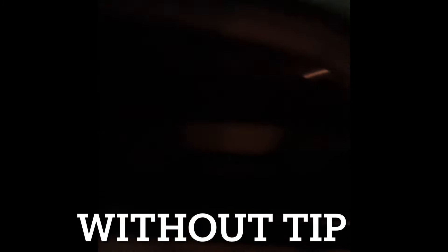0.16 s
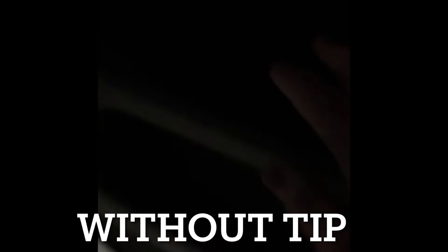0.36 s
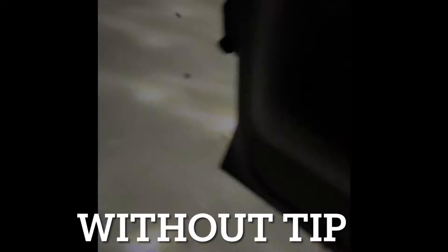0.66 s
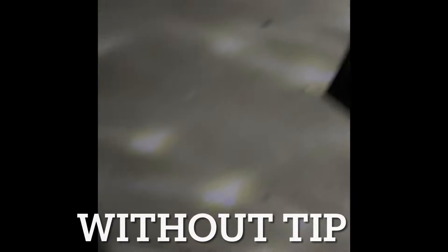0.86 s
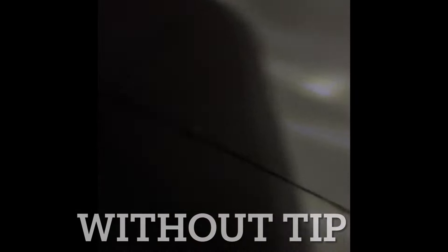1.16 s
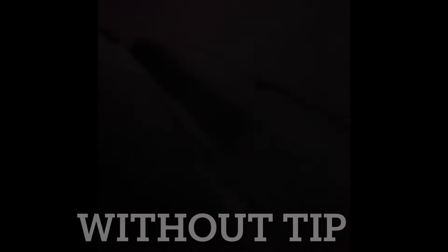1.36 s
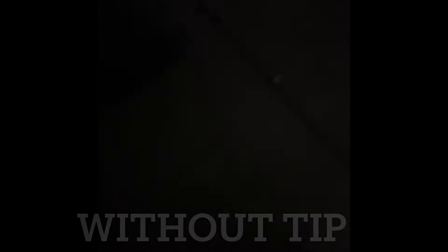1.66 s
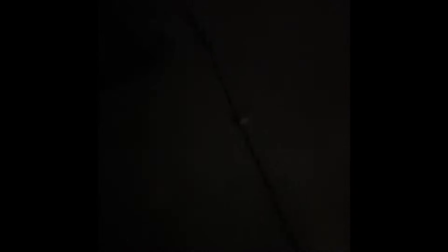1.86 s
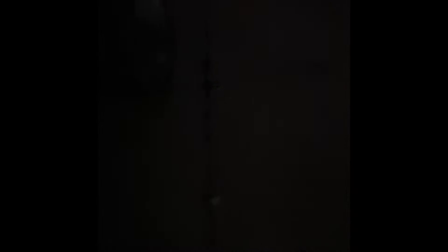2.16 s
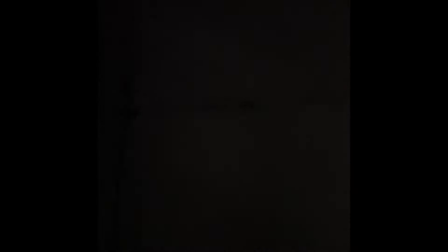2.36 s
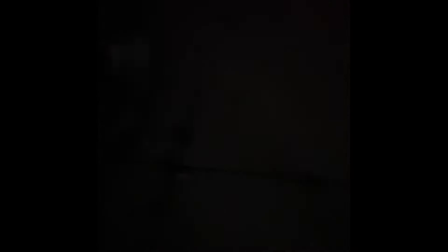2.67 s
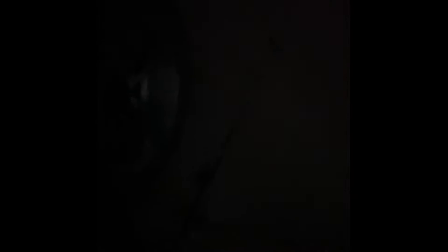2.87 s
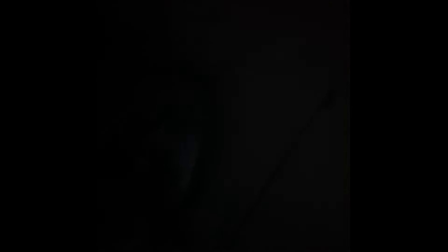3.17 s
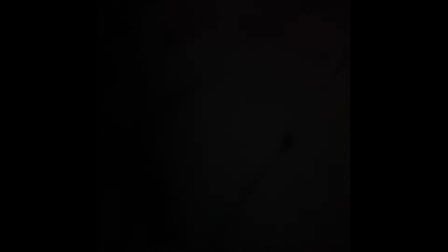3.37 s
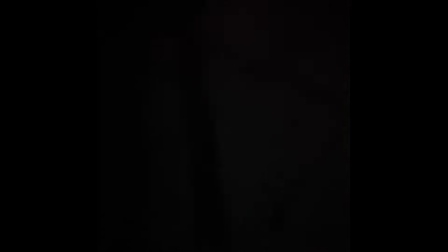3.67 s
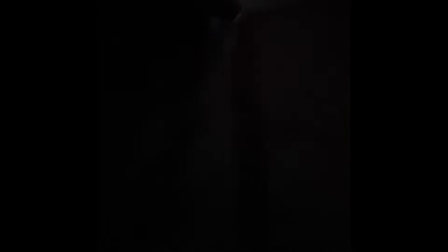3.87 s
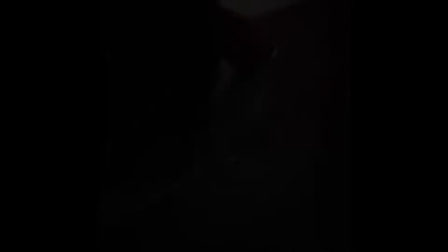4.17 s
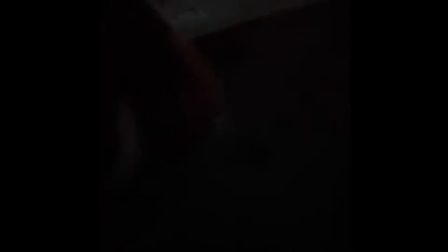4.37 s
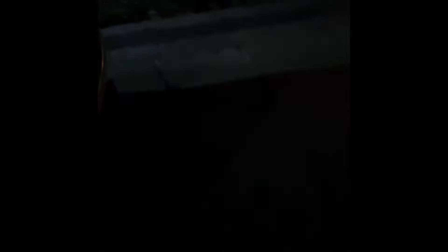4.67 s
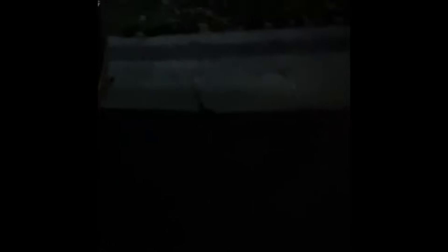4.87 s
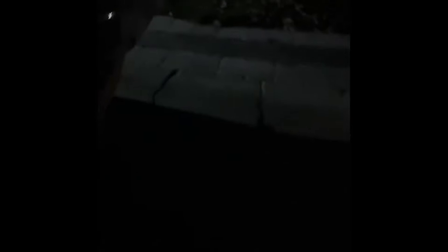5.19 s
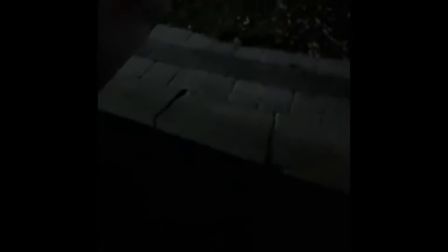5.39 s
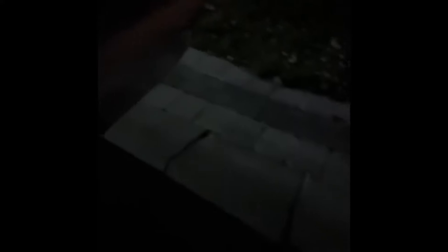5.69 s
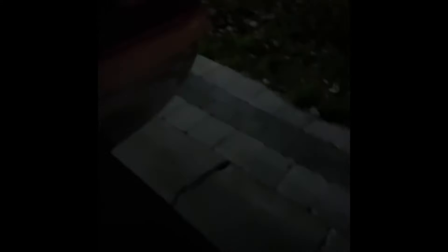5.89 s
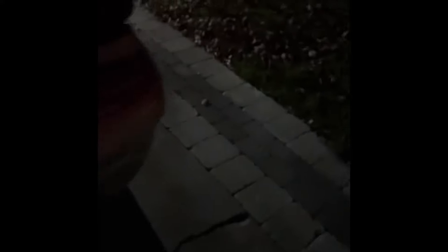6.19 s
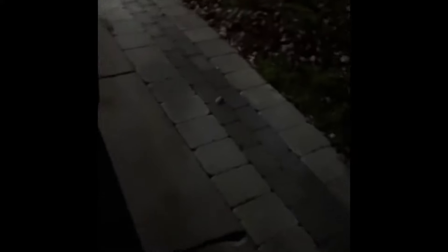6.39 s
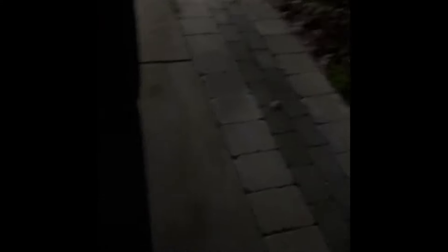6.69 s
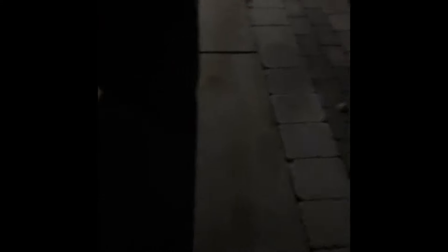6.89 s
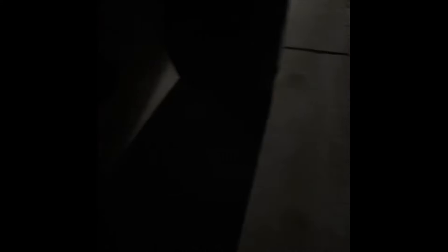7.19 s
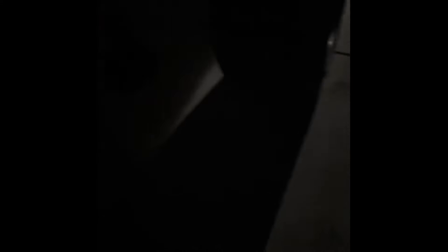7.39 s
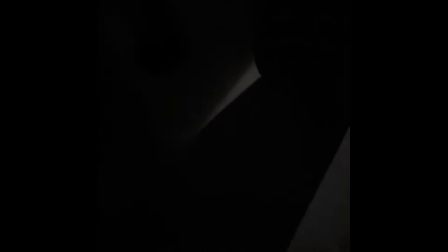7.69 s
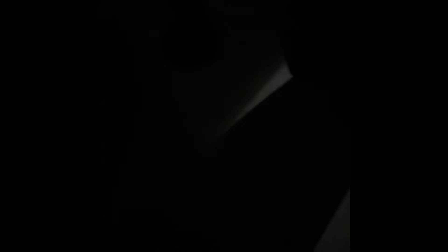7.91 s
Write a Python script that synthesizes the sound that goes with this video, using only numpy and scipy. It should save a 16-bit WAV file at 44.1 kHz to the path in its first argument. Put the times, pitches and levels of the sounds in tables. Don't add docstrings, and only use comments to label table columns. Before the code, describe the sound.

From 0 s a large turbo diesel is already running at a fast idle, heard in the cab: a deep boom near 110 Hz with a throb around 55 Hz and an uneven, loping growl. Dry taps of a hand on the phone case fall at about 0.2 and 0.6 s. Between 0.6 and 1.2 s the engine slows slightly and the bass thins as the phone moves into the garage. Clatter and turbo hiss rise from 1.4 s; the boom swells near 2 s and dips sharply around 2.6 to 2.9 s. From 3 s, outdoors, steady clattering rush leans left over a weaker throb. From 4.6 s the tailpipe jet approaches, growing into a loud, rough, puffing rush by 6 to 7 s, with a hollow sweeping ground echo. After 7.3 s it eases and the low boom fades, the engine still running at 8 s.

```python
import sys
import numpy as np
from scipy import signal
from scipy.fft import rfft, irfft
from scipy.io import wavfile
from scipy.ndimage import uniform_filter1d

SR = 44100
rng = np.random.default_rng(int(sys.argv[2]) if len(sys.argv) > 2 else 0)


def store_pcm(level_fs):
    pcm = np.round(np.clip(level_fs, -1, 1) * 32767).astype(np.int16)
    wavfile.write(sys.argv[1], SR, np.atleast_2d(pcm).T)


def how_loud(loudness_db):
    steps = np.asarray(loudness_db, float) / 20
    return 10 ** steps


N = 355005


def unit_rms(x):
    return x / np.sqrt(np.mean(abs(x) ** 2) + 1e-20)


def read_spectrum(points, hz):
    table_hz, value = np.transpose(points)
    return np.interp(np.log(hz + 1), np.log(table_hz + 1), value)


def follow(rows, t):
    time_s, *columns = np.transpose(rows)
    return [np.interp(t, time_s, column) for column in columns]


def drift(t, top_hz, count):
    hz = np.geomspace(top_hz / 10, top_hz, 12)[:, None]
    start = rng.random((count, 12, 1))
    sines = np.sin(2 * np.pi * (hz * t + start))
    return unit_rms((sines / np.sqrt(hz)).sum(1))


# (time [s], engine cycles [Hz], firing order [dB], pipe boom [dB],
# uneven low orders [dB], uneven high orders [dB])
ENGINE_CURVE = [(0.0, 7.065, -17.0, -14.0, -15.0, -24.0), (0.15, 7.054, -17.0, -11.0, -18.0, -22.0),
                (0.3, 7.039, -18.0, -9.0, -19.0, -20.0), (0.45, 6.986, -19.0, -8.0, -21.0, -20.0),
                (0.6, 6.925, -20.0, -8.0, -21.0, -21.0), (0.75, 6.704, -23.0, -15.0, -17.0, -23.0),
                (0.9, 6.703, -24.0, -12.0, -20.0, -25.0), (1.05, 6.704, -30.0, -13.0, -19.0, -28.0),
                (1.2, 6.639, -35.0, -17.0, -22.0, -30.0), (1.35, 6.626, -35.0, -18.0, -25.0, -30.0),
                (1.5, 6.677, -35.0, -15.0, -25.0, -29.0), (1.65, 6.613, -34.0, -17.0, -24.0, -28.0),
                (1.8, 6.776, -34.0, -13.0, -25.0, -29.0), (1.95, 6.768, -33.0, -11.0, -26.0, -29.0),
                (2.1, 6.795, -32.0, -11.0, -25.0, -29.0), (2.25, 6.742, -33.0, -12.0, -26.0, -29.0),
                (2.4, 6.73, -35.0, -15.0, -24.0, -28.0), (2.55, 6.543, -36.0, -25.0, -22.0, -30.0),
                (2.7, 6.479, -31.0, -25.0, -25.0, -28.0), (2.85, 6.453, -30.0, -26.0, -21.0, -26.0),
                (3.0, 6.499, -30.0, -21.0, -23.0, -30.0), (3.25, 6.564, -33.0, -18.0, -22.0, -29.0),
                (3.5, 6.639, -39.0, -16.0, -24.0, -28.0), (3.75, 6.63, -49.0, -19.0, -22.0, -26.0),
                (4.0, 6.607, -41.0, -21.0, -20.0, -26.0), (4.25, 6.604, -38.0, -19.0, -23.0, -27.0),
                (4.5, 6.644, -35.0, -14.0, -23.0, -28.0), (4.75, 6.568, -33.0, -17.0, -23.0, -25.0),
                (5.0, 6.541, -33.0, -18.0, -20.0, -26.0), (5.25, 6.552, -31.0, -18.0, -22.0, -29.0),
                (5.5, 6.564, -31.0, -19.0, -22.0, -27.0), (5.75, 6.525, -30.0, -20.0, -20.0, -25.0),
                (6.0, 6.57, -30.0, -18.0, -19.0, -23.0), (6.25, 6.649, -29.0, -16.0, -19.0, -25.0),
                (6.5, 6.629, -29.0, -17.0, -21.0, -24.0), (6.75, 6.588, -30.0, -20.0, -20.0, -25.0),
                (7.0, 6.619, -33.0, -20.0, -25.0, -28.0), (7.25, 6.59, -34.0, -22.0, -26.0, -31.0),
                (7.5, 6.6, -37.0, -25.0, -30.0, -33.0), (7.75, 6.597, -37.0, -26.0, -30.0, -34.0),
                (8.0, 6.475, -38.0, -30.0, -26.0, -34.0), (8.05, 6.473, -39.0, -30.0, -26.0, -33.0)]


def engine_cycles():
    return np.cumsum(follow(ENGINE_CURVE, np.arange(N) / SR)[0]) / SR


# (order of the engine cycle, cab [dB], garage [dB], outdoors [dB])
UNEVEN_ORDERS = [(5, -22, -37, -41.0), (6, -24, -31.0, -37), (7, -20.0, -26.0, -27), (9, -12, -16, -18),
                 (10, -20.5, -19, -27), (11, -8.5, -13.0, -13.5), (12, -7, -11.5, -12.5),
                 (13, -11, -16.0, -13), (14, -21, -13, -14.5), (15, -15, -18, -26.5), (17, -7, -7.5, -5),
                 (18, -19, -12.0, -10), (19, -10.5, -14, -17), (20, -19, -9, -10.5), (21, -15, -9.5, -9.0),
                 (22, -23, -15.5, -14.0), (23, -9, -20.5, -27), (24, -3, -9.5, -11), (25, -8.5, -15, -23),
                 (26, -7.5, -13, -9.5), (27, -9.5, -14.0, -22), (28, -13.5, -10.5, -14.5),
                 (29, -17.0, -12, -20.5), (30, -27, -5.5, -13), (31, -26, -11, -3.5),
                 (32, -7.5, -12.5, -16.5), (33, -27, -19, -25), (34, -27.0, -15.5, -19.5),
                 (35, -24, -11.5, -12), (36, -32, -14, -15.5), (37, -28, -18.0, -22), (38, -31, -18, -18),
                 (39, -31.0, -23, -31), (40, -26, -25, -21), (41, -37, -33, -22), (42, -31.0, -23.0, -29.5),
                 (43, -28, -25, -25.5)]
# (time [s], place [0 cab, 1 garage, 2 outdoors])
PHONE_PLACE = [
    (0, 0),
    (.75, 0),
    (1.1, 1),
    (2.5, 1),
    (3.1, 2),
    (8.05, 2.1),
]
# (time [s], boom change [dB], half length [s])
WEAK_FIRINGS = [(0.787, -6, 0.027), (1.08, -5, .025), (1.235, -4, .025), (1.674, -5, 0.027),
                (2.575, -10, .03), (2.85, -11, 0.018)]


def exhaust():
    step = 32
    t = np.arange(0, N + step, step) / SR
    cycle = np.interp(t, np.arange(N) / SR, engine_cycles())
    _, firing_db, boom_db, low_db, high_db = follow(ENGINE_CURVE, t)
    boom_db = boom_db + sum(db * np.exp(-((t - s) / half_s) ** 2) for s, db, half_s in WEAK_FIRINGS)
    out = how_loud(firing_db - 0.1) * np.cos(2 * np.pi * (8 * cycle + 0.32))
    out += how_loud(boom_db + 0.83) * np.cos(2 * np.pi * (16 * cycle + 0.11))
    place = follow(PHONE_PLACE, t)[0]
    wavers = drift(t, top_hz=2.5, count=len(UNEVEN_ORDERS))
    lags = rng.random(len(UNEVEN_ORDERS))
    for (order, *share_db), waver, lag in zip(UNEVEN_ORDERS, wavers, lags):
        k = round(order)
        if k in (17, 18):
            lag = .1 + k % 2 / 4
        group_db = low_db if k < 24 else high_db
        level_db = group_db + np.interp(place, range(3), share_db) + 1.5 * waver
        out += how_loud(level_db) * np.cos(2 * np.pi * (k * cycle + lag + 0.033 * waver))
    return np.sqrt(2) * signal.resample_poly(out, step, 1)[:N]


# (frequency [Hz], likeness [clipped to 0-1])
PORT_LIKENESS = [
    [(60, 2.5), (140, 0.7), (340, 1.06), (810, 0.5), (1920, 0.88), (4570, 0.18), (10900, 2)],
    [(60, 1.0), (140, 3.5), (340, 0.7), (810, 1.26), (1920, 0.9), (4570, 1.02), (10900, 2.5)],
]
# (frequency [Hz], phase [rad])
PORT_PHASE = [
    [(0, 0), (520, 0.64), (2150, -0.15), (3270, -2.4), (4220, 0.2), (5430, -6.0), (7490, -7), (8610, -6.5), (9820, -6.9), (11000, -10)],
    [(0, -8.5), (780, 0.45), (2330, -1.58), (3450, 1.5), (3960, 1), (4480, -2.4), (5000, 3), (5430, 0.55), (9470, -1.5), (11000, -2.5)],
]
# (frequency [Hz], left-right [dB])
PORT_LEAN = [
    [(60, 2), (140, -1.0), (340, -2), (810, 2.5), (1920, 0.5), (4570, 1), (10900, -1)],
    [(60, 5), (140, 2), (340, -3.5), (810, 3), (1920, 0), (4570, 3), (10900, -2.5)],
]


def ports(points, which, frames, patchy_db):
    hz = np.fft.rfftfreq(1024, 1 / SR)
    a, b, c, d, patches = rng.standard_normal((frames, 513, 5)).T
    patches = uniform_filter1d(patches, size=10, axis=0)
    patches = unit_rms(uniform_filter1d(patches, size=16, axis=1))
    same = np.clip(read_spectrum(PORT_LIKENESS[which], hz), 0, 1)[:, None]
    phase_rad = read_spectrum(PORT_PHASE[which], hz)[:, None]
    lean = how_loud(read_spectrum(PORT_LEAN[which], hz) / 2)[:, None]
    left = a + 1j * b
    right = (same * left + np.sqrt(1 - same ** 2) * (c + 1j * d)) * np.exp(-1j * phase_rad)
    colour = how_loud(read_spectrum(points, hz)[:, None] + patchy_db * patches)
    return np.array([left * lean, right / lean]) * colour


# (time [s], clatter [dB], hiss [dB], body drone [dB], left-right [dB])
RUSH_CURVE = [(0.0, -38, -39.5, -34, 0.0), (0.04, -35, -39, -34, 1.5), (0.13, -34, -37.5, -29, 1),
              (0.49, -35.5, -37.5, -32.5, 1.5), (1.41, -30.5, -36.5, -34.5, 0), (1.7, -28, -31.5, -33, 1),
              (2.11, -27.5, -30, -33, 2), (2.22, -28.5, -31.5, -30.5, 2.5), (2.33, -26.5, -30.5, -34, 2.5),
              (2.6, -30, -34, -36, 5.0), (2.76, -30, -34, -35, 4), (2.96, -27, -32.5, -31, 4.0),
              (3.09, -28.5, -33.5, -35.5, 4), (3.16, -26, -30.5, -30.5, 4), (3.34, -26, -35, -35.5, 6),
              (3.41, -26, -31, -29, 4.5), (3.52, -26.5, -32, -30.5, 5.5), (3.94, -25.5, -30, -36.5, 4),
              (3.99, -28, -32.5, -36, 3.5), (4.19, -25, -32, -33, 1), (4.24, -29, -32, -33, 1.5),
              (4.64, -27.5, -34, -32.5, 2.5), (4.71, -25, -31.5, -34.5, 3.0),
              (4.8, -24.5, -29.5, -29.5, 1.5), (4.97, -22.5, -30.5, -32, 1.5), (5.09, -23, -28, -31, 2),
              (5.18, -22.5, -29, -31, 1.5), (5.36, -22.5, -26.5, -29, 1.5), (5.67, -19.5, -24.5, -32, 2.5),
              (5.81, -18, -23, -30.5, 3), (6.05, -16.5, -21.5, -26, 2), (6.1, -15.5, -23.5, -27, 2),
              (6.14, -18.5, -21.5, -26.5, 1.0), (6.19, -18, -21.5, -27, 2), (6.28, -17.5, -24, -28, 1.5),
              (6.39, -16, -22, -29.5, 2.5), (6.43, -16.5, -21, -27.5, 2), (6.93, -18, -17.5, -31, 3.5),
              (7.29, -18, -19.5, -35, 3.5), (7.42, -21.5, -20.5, -34.5, 2.5), (7.62, -22, -24, -39, 2.5),
              (7.67, -21, -22.5, -37, 3), (8.0, -22.5, -24.5, -37.5, 1.5), (8.05, -20.5, -23, -36, 2)]
# (time [s], jet share [0-1], extra path of ground echo [ms], echo strength [0-1])
WALK_CURVE = [(0, 0.02, 1.23, 0.23), (1, 0, 1.13, 0.2), (1.5, 0.06, 1.8, 0.07), (2.4, .1, 2.55, 0.2),
              (3, 0.04, 2.57, 0.22), (3.3, 0.01, 1.79, 0.18), (4, 0.07, 1.29, 0.18), (4.6, 0.4, 1.19, 0.2),
              (5.2, 0.66, 1.93, 0.4), (5.6, .9, 2.494, 0.8), (6, 0.99, 2.894, .7), (6.6, 0.99, 3.19, .55),
              (7.4, 1, 3.03, 0.38), (8.05, 0.99, 2.37, 0.16)]
# (frequency [Hz], density [dB per Hz])
GARAGE_SPECTRUM = [(150, -31), (260, -4), (374, 0.5), (481, -8), (564, -4), (630, -6.5), (1390, -2.5),
                   (1960, -5.5), (2090, -7.5), (3200, -9.5), (3630, -10.5), (4980, -21.5), (7880, -16.5),
                   (9670, -29.5), (11300, -46.5), (14700, -74), (22000, -120)]
# (frequency [Hz], density [dB per Hz])
JET_SPECTRUM = [(150, -38), (260, -9), (295, -13), (459, -13), (513, -19), (681, -10), (785, -8.5),
                (934, -3), (1340, -1), (3100, -10), (3580, -4), (5060, -18.5), (7400, -10), (9230, -20),
                (11300, -33), (14700, -71), (22000, -120)]


def rush():
    frames, hz = N // 256 + 5, np.fft.rfftfreq(1024, 1 / SR)[:, None]
    frame_t, t = np.arange(frames) * 256 / SR, np.arange(N) / SR
    near, echo_ms, echo = follow(WALK_CURVE, frame_t)
    near = np.clip(near, 0, 1)
    z = np.sqrt(1 - near) * unit_rms(ports(GARAGE_SPECTRUM, which=0, frames=frames, patchy_db=2.0))
    z += np.sqrt(near) * unit_rms(ports(JET_SPECTRUM, which=1, frames=frames, patchy_db=1.0))
    rough_ground = np.exp(-hz / 4000.0)
    z *= 1 + echo * rough_ground * np.exp(-2j * np.pi * hz * echo_ms / 1000)

    clatter_db, hiss_db, drone_db, pan_db = follow(RUSH_CURVE, frame_t)
    cycle = engine_cycles()
    firing = np.cos(2 * np.pi * (8 * cycle + 0.42))
    double = np.cos(2 * np.pi * (16 * cycle + 0.67))
    lope = np.cos(2 * np.pi * (cycle + 0.31))
    gust = np.interp(t, frame_t, drift(frame_t, top_hz=29.98, count=1)[0])
    puff_db = 1.68 * firing + 0.94 * double + 0.74 * lope + 0.83 * gust

    out = np.zeros((2, N))
    bands = ((0, 700, drone_db, .3), (700, 2400, clatter_db, .8), (2400, SR, hiss_db, 1.1))
    for lo_hz, hi_hz, level_db, puff in bands:
        band = z * ((hz >= lo_hz) & (hz < hi_hz))
        power = uniform_filter1d((abs(band.mean(0)) ** 2).sum(0), size=60)
        steady = band / np.sqrt(power)
        mono = signal.istft(steady.mean(0), nperseg=1024, noverlap=768)[1]
        level = unit_rms(mono).std()
        sound = signal.istft(steady, nperseg=1024, noverlap=768)[1][:, :N]
        sound = sound * level / sound.mean(0).std() * how_loud(np.interp(t, frame_t, level_db))
        out += sound * how_loud(puff * puff_db)
    pan_db = np.interp(t, frame_t, pan_db - 2.0)
    return out * how_loud(np.array([.5 * pan_db, -.5 * pan_db]))


# (time [s], level [dB], centre [Hz], left gain, right gain)
HAND_TICKS = [
    (.177, -28.5, 3500, 1, .8),
    (.583, -31, 2000, 1, -.3),
]


def ticks():
    length = 500
    out, t = np.zeros((2, N)), np.arange(length) / SR
    for s, db, hz, left, right in HAND_TICKS:
        band = signal.butter(1, [hz / 2.5, hz * 2.2], "band", fs=SR)
        burst = signal.lfilter(*band, rng.standard_normal(length))
        burst = how_loud(db - 60 * t / .025) * unit_rms(burst)
        out[:, round(s * SR):][:, :length] += np.outer([left, right], burst)
    return out


# (frequency [Hz], density [dB per Hz])
RUMBLE_SPECTRUM = [(25, -30), (45, -11), (60, -7.5), (110, 2.5), (200, -5), (260, -12.5), (320, -38)]


def rumble():
    colour = how_loud(read_spectrum(RUMBLE_SPECTRUM, np.fft.rfftfreq(N, 1 / SR)))
    noise = irfft(rfft(rng.standard_normal(N)) * colour, N)
    low_db = follow(ENGINE_CURVE, np.arange(N) / SR)[3]
    return unit_rms(noise) * how_loud(low_db - 8.5)


def fizz():
    band = signal.butter(6, [10800, 16000], "band", fs=SR, output="sos")
    noise = signal.sosfilt(band, rng.standard_normal(N))
    hiss_db = follow(RUSH_CURVE, np.arange(N) / SR)[1]
    return unit_rms(noise) * how_loud(hiss_db - 29) * np.array([[1], [-1]])


def scene():
    bass = exhaust() + rumble()
    late = np.r_[np.zeros(2), bass[:-2]]
    return np.array([how_loud(-.35) * late, how_loud(0.5) * bass]) + rush() + fizz() + ticks()


def band_limit(x):
    return signal.sosfilt(signal.butter(12, 11480, fs=SR, output="sos"), x)


def record(dry):
    mix = 1.606 * np.tanh(dry / 1.593)
    return band_limit(mix)


dry = scene()
out = record(dry)
store_pcm(out)
```